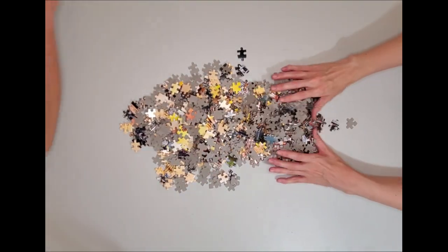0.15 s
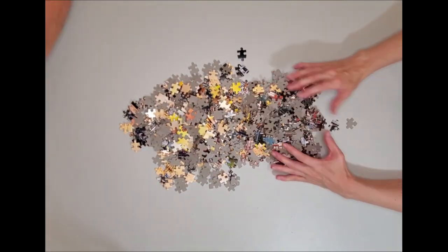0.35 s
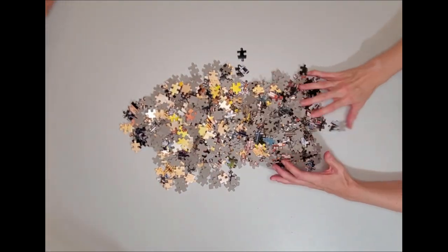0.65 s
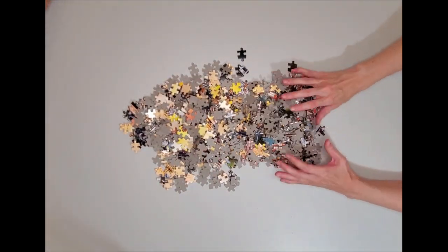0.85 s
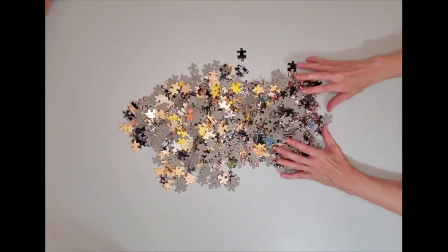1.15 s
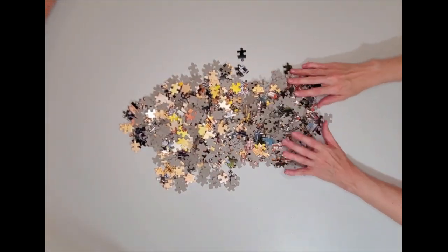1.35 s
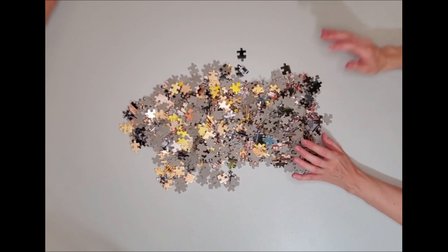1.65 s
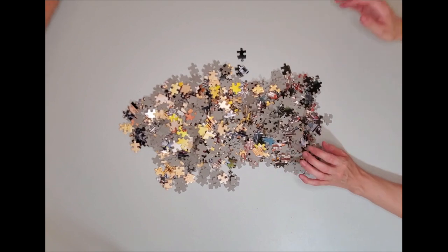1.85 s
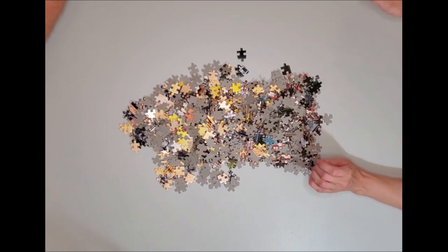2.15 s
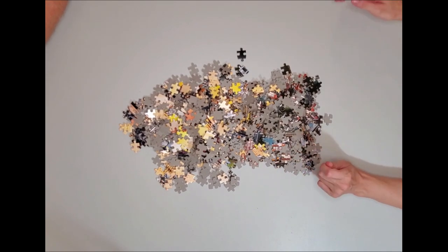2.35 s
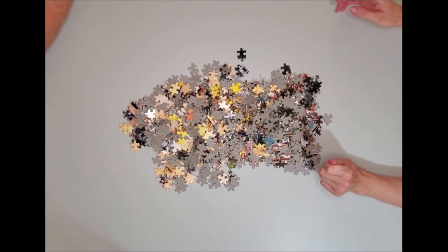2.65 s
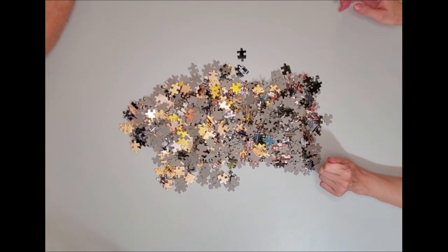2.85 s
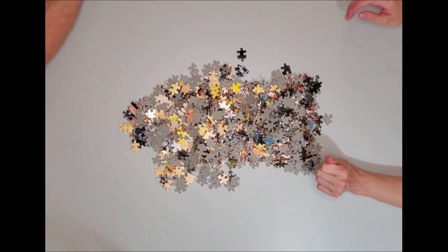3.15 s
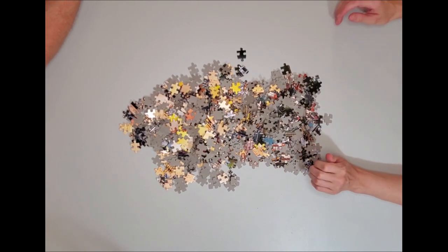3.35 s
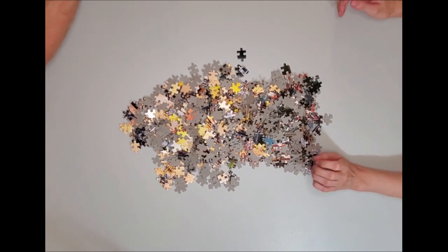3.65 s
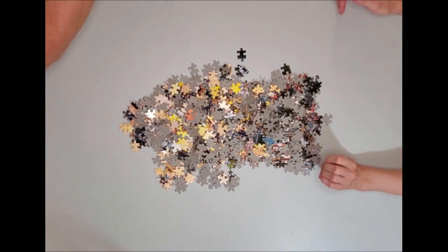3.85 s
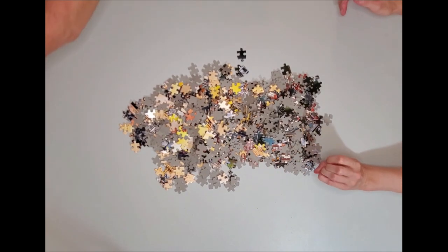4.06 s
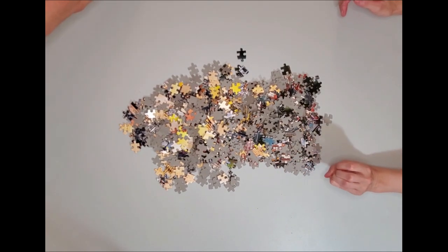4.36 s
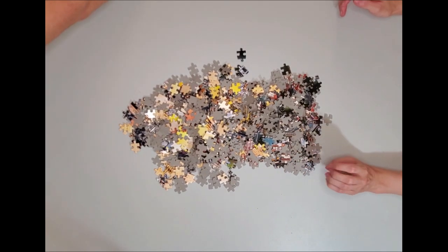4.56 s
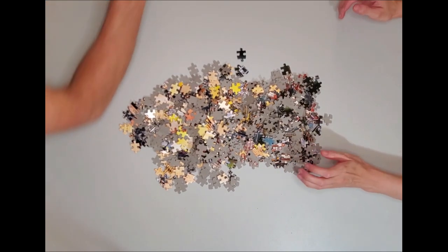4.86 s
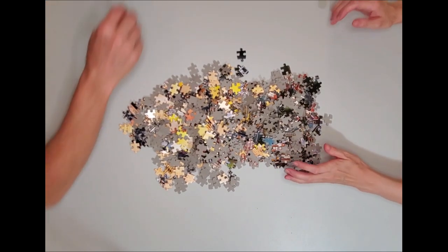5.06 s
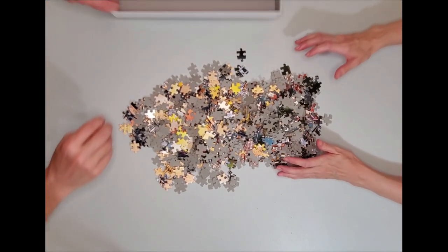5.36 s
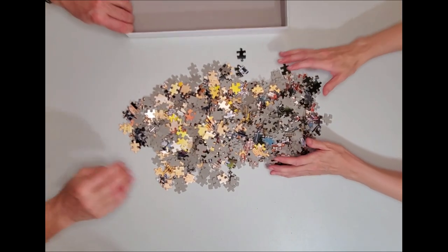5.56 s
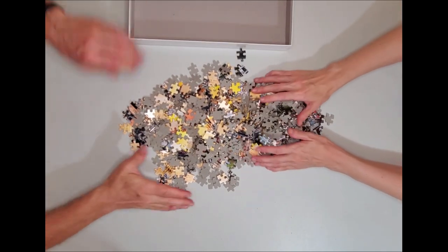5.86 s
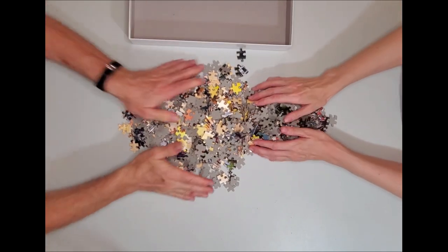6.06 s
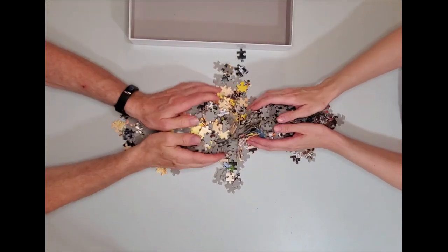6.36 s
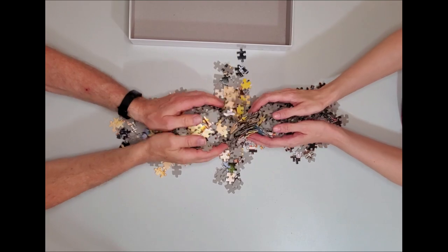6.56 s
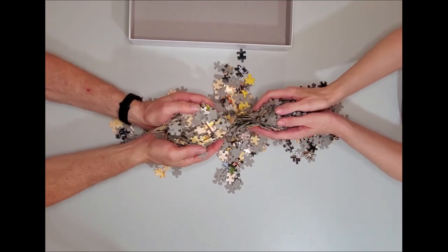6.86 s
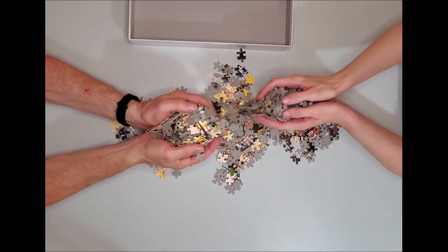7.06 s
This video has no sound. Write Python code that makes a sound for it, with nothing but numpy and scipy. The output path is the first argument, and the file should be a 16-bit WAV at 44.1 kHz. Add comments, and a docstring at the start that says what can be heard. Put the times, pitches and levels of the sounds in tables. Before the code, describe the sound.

Cardboard box thuds and rubs across a tabletop in a quiet room, followed by hands gathering loose puzzle pieces in a crisp rustling rush.

```python
"""A cardboard box is handled, knocked and set down on a table: each blow rings the air inside and the
walls under a puff of rattling card, and the box shudders. Dragging it is slip noise through resonances.
Hands sweep cardboard puzzle pieces together: dense short rings rustle, single ones clack, edges tick.
Swipes of card over card swell and die. A steady room tone lies under all; two microphone ports hear it."""
import sys
import numpy as np
from scipy import signal
from scipy.fft import rfft, irfft, next_fast_len
from scipy.io import wavfile
from scipy.ndimage import map_coordinates

SR = 44100
rng = np.random.default_rng(int(sys.argv[2]) if len(sys.argv) > 2 else 0)


def to_wav(sig):
    """Store sig (one row per channel, or 1-D mono) as 16-bit WAV at the path in sys.argv[1].

    Samples outside -1..1 are clipped; the rate is SR.
    """
    pcm = np.clip(np.atleast_2d(sig), -1, 1) * 32767
    pcm = np.round(pcm).astype(np.int16)
    wavfile.write(sys.argv[1], SR, pcm.T)  # frames by channels


N = 317520

# Room tone. Each row: frequency in Hz, relative density in dB per Hz.
AIR_SPECTRUM = [(15, -56), (25, 2), (55, 5.5), (99, -2.5), (116, -20.5), (222, -15), (291, -15),
                (437, -14.5), (672, -28.5), (791, -4.5), (1010, -12.5), (1590, -13.5), (1730, -18.5),
                (2150, -32), (3000, -43.5), (15800, -53.5)]
# Room decay. Each row: frequency in Hz, time to fall 60 dB in seconds.
ROOM_T60 = [(100, 0.42), (500, 0.21), (2000, 0.34), (8000, 0.34), (16000, 0.051)]
# Likeness of the two ports. Each row: frequency in Hz, left-right correlation.
PORT_LIKENESS = [(60, 0.83), (250, 0.92), (700, 0.6), (1500, 0.043), (4000, 0.05), (12000, 0.04)]
# Colour difference of the ports. Each row: frequency in Hz, left over right in dB.
PORT_BALANCE = [(60, -0.5), (150, 0), (380, 1), (950, 2), (2380, 1), (5980, 1), (15000, 10.5)]
# Shading by the housing, same on both ports. Each row: frequency in Hz, gain in dB.
HOUSING_SHADE = [(5500, 0.5), (7600, -8), (9500, -4.5)]
# Table rumble. Each row: frequency in Hz, relative density in dB per Hz.
RUMBLE_SPECTRUM = [(25, -40), (55, 0.5), (120, -3.5), (170, -9.5), (260, -40.5)]
# Scuff on the table. Each row: frequency in Hz, relative density in dB per Hz.
SCUFF_SPECTRUM = [(450, -4), (700, -3), (1100, -7.5), (1900, -8.5), (2800, -30.5)]
# Rustle hiss. Each row: frequency in Hz, relative density in dB per Hz.
HISS_SPECTRUM = [(3240, -16), (5500, -20), (6420, -4), (7590, -10), (10200, -7), (15100, -5.5),
                 (15800, -29.5)]
# Rubbed hollow box. Each row: resonance in Hz, width in Hz, relative level in dB.
HOLLOW_MODES = [(218.6, 28, 1), (329.8, 17.2, 9), (388.3, 25.5, 1.5), (531, 18, 1)]
# Swiped sheet. Each row: resonance in Hz, width in Hz, relative level in dB.
SHEET_MODES = [(887, 460, 3.5), (1290, 830, 2.5), (1960, 410, 3), (2980, 1400, -7.5), (4330, 1400, -6),
               (10500, 18000, -20.5)]
# Pieces sliding flat: pitch in Hz, spread as a share.
FLAT_PITCH = (2733, 0.099)
# Pieces rattling on edge: pitch in Hz, spread as a share.
EDGE_PITCH = (4080, 0.13)
# Stirred pieces and card. Each row: time in seconds, hiss level in dB, flat pieces over it in dB.
RUSTLE_CURVE = [(0.0, -60, 3.5), (0.12, -55.5, -8), (0.28, -52, 3), (0.48, -61, -2.5), (0.7, -66, 2),
                (0.97, -55, -17), (1.08, -75, -0.5), (1.5, -71.5, 1.5), (2.0, -85.5, 1),
                (2.33, -88.5, 10.5), (2.45, -73, 3.5), (3.15, -79, 8.5), (3.42, -59, 0.5), (3.62, -64, 6),
                (3.75, -53, -12), (3.85, -77, 1), (4.1, -85, -17), (4.2, -65, -15.5), (4.62, -64, 1),
                (4.9, -87, -13), (5.5, -77, -6), (5.7, -63.5, -4), (5.95, -66, 7.5), (6.17, -59, 3),
                (6.35, -50.5, 6), (6.7, -51.5, 0), (7.0, -56.5, 3.5), (7.2, -55, 2)]
# Dragged box. Each row: time in seconds, rubbing drive in dB, table rumble level in dB.
DRAG_CURVE = [(0.0, -57.5, -46), (0.14, -44.5, -61), (0.26, -49, -70), (0.44, -56, -73), (0.54, -53, -54),
              (0.98, -59, -65), (1.94, -63, -72), (2.34, -63, -67.5), (2.59, -55, -69), (2.77, -54.5, -56),
              (3.15, -57.5, -59.5), (3.35, -56.5, -57), (3.47, -43.5, -44.5), (3.57, -36.5, -70),
              (3.95, -68, -57.5), (4.31, -62, -66.5), (4.67, -62, -55), (4.95, -66, -65.5),
              (5.57, -67.5, -67), (5.73, -56, -49), (5.88, -66, -51.5), (6.17, -62.5, -52),
              (6.46, -56, -48.5), (6.74, -54.5, -48.5), (6.9, -55, -54.5), (7.2, -69, -53.5)]
# Brushes of a hand. Each row: time at full level in seconds, rise in seconds, hold in seconds, level in dB.
HAND_BRUSHES = [(0.53, 0.03, 0.014, -62), (0.802, .07, 0.023, -65.5), (0.905, 0.036, 0.013, -66),
                (1.14, 0.077, 0.034, -74), (1.305, 0.045, 0.025, -72), (1.822, 0.066, 0.039, -82),
                (2.404, .04, 0.025, -66), (2.833, 0.025, 0.04, -76), (2.924, 0.055, .02, -75),
                (3.244, 0.058, 0.021, -67), (4.17, .07, 0.018, -60), (4.279, 0.066, 0.032, -61.5),
                (4.417, 0.034, 0.015, -72), (5.165, 0.14, 0.034, -71.5), (5.73, .012, 0.15, -54.5),
                (7.09, .04, 0.16, -63)]
# Card swiped over card. Each row: loudest moment in seconds, level there in dB.
CARD_SWIPES = [(0.94, -44.5), (3.265, -46.5), (3.892, -28), (4.157, -53.5), (4.297, -56.5)]
# Pieces snapping together. Each row: time in seconds, level in dB, pitch in Hz, left over right in dB.
PIECE_CLACKS = [(1.3357, -50.5, 2630, 13.5), (1.5881, -48.5, 2900, -14), (2.407, -51, 3540, -6),
                (2.8094, -55, 3200, -11), (5.7625, -41, 3920, -15), (5.7994, -38, 3720, -9),
                (5.8494, -53, 3200, -4), (5.9948, -46, 2930, -0.5), (6.0482, -41, 2680, -1),
                (6.1581, -52, 2900, -2.0), (6.1827, -38, 2660, -1.5), (6.292, -34, 2530, 0),
                (6.2945, -28.5, 3100, -1), (6.3658, -29.5, 2660, -3), (6.3837, -30.5, 3080, 1),
                (6.516, -32, 3200, -6), (6.6196, -29.5, 2680, -3.5), (6.6805, -33.5, 2620, 0.0),
                (6.7825, -39.5, 2800, 3.5), (6.8019, -29, 2720, 0), (6.8137, -33, 2600, -2.5),
                (6.8523, -39, 2720, 0), (6.866, -28.5, 2770, -8), (6.9537, -34, 2690, -4),
                (7.0771, -29, 4200, -6.5), (7.1087, -28.5, 4060, -7), (7.1202, -26, 4100, -5),
                (7.1416, -30, 4470, -9.5)]
# Ticks of card edges. Each row: start in seconds, peak before panning in dB, left over right in dB.
EDGE_TICKS = [(0.1047, -26, -3.5), (0.1355, -34, 16), (1.5878, -49, 17), (2.557, -40, 11), (2.7053, -40, 6),
              (3.249, -37, 1.5), (3.4486, -38, 7), (3.5488, -32, 10), (3.5824, -20, 0), (3.6152, -28, 9),
              (3.6371, -17, -1), (3.8881, -38, 1), (4.321, -30.5, 6), (4.587, -37, 13), (5.7222, -22, 3),
              (5.8154, -26, 6), (6.8164, -37, 12), (7.0763, -44, 9.0), (7.0923, -37, 5), (7.1204, -27, 14)]
# Walls and table top. Each row: mode in Hz, relative level in dB, decay time as a share of the blow's.
WALL_MODES = [(84.2, 4, 2.7), (132, 2.5, 1.2), (161.5, -2.5, 1.06), (251.3, -3, 1.08), (411.8, -14.5, 1.76),
              (530, -6.5, 1.02), (582, -2, 0.37), (713, -8, 0.86), (850.5, -12, 0.89), (1074, -6, 0.64),
              (1313, -17, 0.36), (1688, -6.5, 0.35), (1700, -30, 0.13), (2122, -15, .6)]
# Loose card in a blow. Each row: frequency in Hz, gain in dB.
RATTLE_COLOUR = [(100, -8), (500, 6.5), (1200, 7), (2500, -3), (8000, 3)]
# Blows on the box. Each row: time in seconds, level in dB, air pitch in Hz, thud in dB, knock in dB,
# crack in dB (the last three relative, near 130, 1000 and 3000 Hz), time to fall 60 dB in seconds.
BOX_BLOWS = [(0.098, -35.5, 417.5, -33, -13, 1, 0.45), (0.16, -32, 351, -16.5, -11, -0.5, 0.15),
             (0.199, -40, 538, -20, -34, -27, 0.29), (0.259, -39.5, 358, -26, -16, -7, 0.28),
             (0.336, -13, 364.4, -22.5, -14.5, -39, 0.059), (0.369, -28, 353.5, -8, -7, -41, 0.12),
             (0.529, -21, 393, -13, -5, -19, 0.11), (0.641, -21, 300, -5, -24, -36, .04),
             (0.77, -39, 360, -33.5, -12, -4, 0.076), (0.931, -36.5, 516, -6, -1.5, -12, 0.085),
             (1.331, -53, 275, 2, 0, 10, 0.13), (1.813, -40.5, 348.4, -17, -7.5, -16, 0.13),
             (2.349, -40, 350, -42, 1, -29, 0.082), (2.379, -35, 340, -18, 3, -6.5, 0.087),
             (2.558, -33, 353, -8, -14, -7, 0.09), (2.704, -25, 345, -23.5, -10, -17.5, .11),
             (2.797, -37, 393, -25, -24, -3, 0.12), (3.284, -34.5, 360, -13, -6, -23, 0.081),
             (3.416, -30.5, 520, -9, -6, -12, 0.19), (3.451, -11.5, 457, -25.5, 7.5, -11, 0.095),
             (3.541, -15, 401, -9, -4, -1, 0.088), (3.584, -11, 405, -14.5, -2, -1, 0.063),
             (3.616, -23, 437, -41, 4.5, 5.5, .083), (3.665, -25.5, 312, -6, -1.5, 6.5, 0.065),
             (4.142, -53, 337, -9, -10, -3, 0.21), (4.527, -42.5, 326, -2, 2, -11, 0.15),
             (4.579, -48, 279, -1.5, -4, 0, .2), (4.696, -38.5, 357, -8.5, 5.5, 11, .13),
             (5.196, -48, 780, -18, 1, -2.5, 0.13), (5.551, -24.5, 293, -2, -16, -8.5, 0.09),
             (5.598, -30, 292, 5, -22, -12, 0.087), (5.649, -46, 464, 13.5, -15, 3, 0.097),
             (5.802, -37, 350, 2, -1.5, 6, 0.071)]

AIR_DB, TOP_HZ, FULL_SCALE = -60, 15900, 0.97
EDGE_DB, EDGE_FOLLOWS_FLAT = 0.5, 0.4  # over the rustle; share of the flat pieces' lead added
PILE_DB = -11.5  # scuff of the sliding heap, over the flat pieces
SCUFF_DB, RUB_GROWS = -2, 1.4  # over the drive; hollow swings wider around the mean drive
SHAKE_DB, SHAKE_RISE_S, SHAKE_T60_S = -19, 0.004, 0.09  # level relative to the blow
SHAKE_SCUFF_DB, SHAKE_RUMBLE_DB = -4.5, -16.5  # over the shudder of the hollow
BRUSH_T60_S = 0.2
BRUSH_HISS_DB, BRUSH_FLAT_DB, BRUSH_EDGE_DB = 1.5, -4, -1  # over the brush level
SWIPE_RISE_S, SWIPE_T60_S = 0.057, 0.1  # per 60 dB up, per 60 dB down
TAP_DB, TAP_DB_PER_OCTAVE = -15, -20  # at the flat pitch; slope with clack pitch
RISE_S, RISE_AT_DB, RISE_S_PER_DB = 0.000855, -18, 0.0000969  # weaker blows rise slower
LEAD_MS = 0.15  # the left port hears the box first


def amp(db):
    """dB to gain."""
    return 10 ** (np.asarray(db) / 20)


def unit(x):
    """Scaled to rms 1."""
    return x / np.sqrt(np.mean(x ** 2) + 1e-20)


def along(points, hz):
    """Interpolates (Hz, value) points on a log frequency axis."""
    f, v = np.transpose(points)
    return np.interp(np.log(hz + 1), np.log(f + 1), v)


def spectrum(points):
    """Gain response through (Hz, dB) points."""
    return lambda hz: amp(along(points, hz))


def curves(rows):
    """One value per sample for each column after the time."""
    s, *columns = np.transpose(rows)
    return [np.interp(np.arange(N) / SR, s, column) for column in columns]


def filtered(x, response):
    """x times a complex response of frequency, zero-padded."""
    n = x.shape[-1]
    m = next_fast_len(n + 8192)
    return irfft(rfft(x, m) * response(np.fft.rfftfreq(m, 1 / SR)), m)[..., :n]


def resonant(modes):
    """Causal response of (Hz, width, dB) resonances with alternating signs."""
    def response(f):
        total = 0
        for k, (centre, width, db) in enumerate(modes):
            damping = 1j * f * width
            total = total + (-1) ** k * amp(db) * damping / (centre ** 2 - f ** 2 + damping)
        return total
    return response


def spread(pair, response):
    """Colours two trains and mixes them to left and right with the ports' likeness, rms 1."""
    def mid_side(hz):
        turn = np.arccos(np.clip(along(PORT_LIKENESS, hz), -1, 1)) / 2
        return response(hz) * np.array([np.cos(turn), np.sin(turn)])
    mid, side = filtered(pair, mid_side)
    return unit(np.array([mid + side, mid - side]))


def panned(db):
    """Left and right gains."""
    return amp([[db / 2], [-db / 2]])


def room_tail():
    """One draw of the room's answer: it builds up, then each frequency dies at its own speed."""
    hz, t, z = signal.stft(rng.standard_normal((2, SR // 3)), SR, nperseg=256)
    dying = amp(-60 * t / along(ROOM_T60, hz)[:, None]) * (1 - np.exp(-t / 0.0014))
    noise = signal.istft(z * dying, SR, nperseg=256)[1]
    pair = spread(noise, lambda f: 1)
    return pair / np.linalg.norm(pair[0])


def add(out, s, sound, answer, lead_ms=0):
    """Places a stereo event with the room's answer; the right port lags by lead_ms."""
    heard = signal.fftconvolve(sound.mean(axis=0)[None], answer, axes=1)
    heard[:, :sound.shape[1]] += sound
    for port, lag_s in enumerate((0, lead_ms / 1000)):
        out[port, round((s + lag_s) * SR):][:heard.shape[1]] += heard[port]


def room_tone():
    """Steady coloured noise of the quiet room."""
    return amp(AIR_DB) * spread(rng.standard_normal((2, N)), spectrum(AIR_SPECTRUM))


def grit(per_second, spread_db, smooth):
    """Two trains of tiny slips of uneven size over a share of smooth friction."""
    slips = (rng.random((2, N)) < per_second / SR) * amp(spread_db * rng.random((2, N)))
    return unit(slips * rng.choice([-1, 1], (2, N))) + smooth * rng.standard_normal((2, N))


def chips(pitch, per_second, cycles, spread_db, smooth):
    """Piece contacts each ring a few cycles at their own pitch, in clumps, over their friction."""
    centre_hz, share = pitch
    count = round(per_second * N / SR)
    at, size, side = rng.random((count, 3)).T
    # slow random curves: neighbours in time sound alike
    rows = np.repeat([[0], [1]], count, 1)
    drift, clump = map_coordinates(rng.standard_normal((2, 140)), [rows, np.tile(at * 139, (2, 1))])
    detune = 0.8 * rng.standard_normal((count, 1)) + 0.5 * drift[:, None]
    hz = centre_hz * np.exp(share * detune)
    t = np.arange(SR // 100) / SR
    gain = amp(spread_db * size + 3 * clump)[:, None]
    ring = gain * np.sin(2 * np.pi * hz * t) * t * np.exp(-t * hz / cycles)
    where = ((at * N).astype(int)[:, None] + np.arange(len(t))).ravel()
    pair = [np.bincount(where, (ring * (side[:, None] - k)).ravel(), N + len(t))[:N] for k in (0, 1)]
    friction = filtered(rng.standard_normal((2, N)), resonant([(centre_hz, 2.5 * centre_hz * share, 0)]))
    return spread(unit(np.array(pair)) + smooth * unit(friction), lambda f: 1)


def brushes():
    """Gain of the hand brushes: smooth rise, hold, exponential fade."""
    gain, t = np.zeros(N), np.arange(N) / SR
    for s, rise_s, hold_s, db in HAND_BRUSHES:
        fade_db = -60 * np.maximum(t - s - hold_s, 0) / BRUSH_T60_S
        rise = np.sin(np.pi / 2 * np.clip(1 + (t - s) / rise_s, 0, 1)) ** 2
        gain += amp(db + fade_db) * rise
    return gain


def shudder():
    """Gain that swells after every blow and dies away; short blows shudder shorter."""
    out, t = np.zeros(N + SR), np.arange(SR // 2) / SR
    for s, db, *_, t60_s in BOX_BLOWS:
        dying = amp(db + SHAKE_DB - 60 * t / min(SHAKE_T60_S, t60_s))
        out[round(s * SR):][:len(t)] += (1 - np.exp(-t / SHAKE_RISE_S)) * dying
    return out[:N]


def handling():
    """Slips of hands, box and pieces excite what they touch; blows also shake the box on the table."""
    rustle_db, flat_db = curves(RUSTLE_CURVE)
    drag_db, rumble_db = curves(DRAG_CURVE)
    rub_db = drag_db.mean() + RUB_GROWS * (drag_db - drag_db.mean())
    edge_db = EDGE_DB + EDGE_FOLLOWS_FLAT * flat_db
    shake, brush = shudder(), brushes()

    rumble = spread(grit(87, 3.9, smooth=0.82), spectrum(RUMBLE_SPECTRUM))
    rub = spread(grit(120, 16.6, smooth=0.34), resonant(HOLLOW_MODES))
    scuff = spread(grit(300, 13, smooth=1.0), spectrum(SCUFF_SPECTRUM))
    hiss = spread(grit(1200, 12, smooth=1.2), spectrum(HISS_SPECTRUM))
    flat = chips(FLAT_PITCH, 900, cycles=2.2, spread_db=13, smooth=0.95)
    edge = chips(EDGE_PITCH, 1000, cycles=2.0, spread_db=12, smooth=1.3)

    box = (amp(rumble_db) + amp(SHAKE_RUMBLE_DB) * shake) * rumble
    box += (amp(rub_db) + shake) * rub
    box += (amp(drag_db + SCUFF_DB) + amp(SHAKE_SCUFF_DB) * shake) * scuff
    brushed = brush * (amp(BRUSH_HISS_DB) * hiss + amp(BRUSH_FLAT_DB) * flat + amp(BRUSH_EDGE_DB) * edge)
    heap = amp(flat_db) * (flat + amp(PILE_DB) * scuff)
    rustle = amp(rustle_db) * (hiss + heap + amp(edge_db) * edge)
    return box + brushed + rustle


def swipes(tails):
    """Friction swells quickly and dies away, coloured by the sheet's resonances."""
    out, t = np.zeros((2, N + SR)), np.arange(-SR // 20, SR // 5) / SR
    for k, (s, db) in enumerate(CARD_SWIPES):
        friction = spread(rng.standard_normal((2, len(t))), resonant(SHEET_MODES))
        stroke = amp(db - 60 * np.maximum(-t / SWIPE_RISE_S, t / SWIPE_T60_S))
        add(out, s + t[0], stroke * friction, amp(-3) * tails[k % len(tails)])
    return out[:, :N]


def clacks(tails):
    """Pieces snap: two damped partials and noise, with a low tap on the table."""
    out, t = np.zeros((2, N + SR)), np.arange(SR // 30) / SR
    for k, (s, db, hz, pan_db) in enumerate(PIECE_CLACKS):
        body = np.sin(2 * np.pi * hz * t) + 0.48 * np.sin(2 * np.pi * 1.17 * hz * t)
        body += 0.5 * rng.standard_normal(len(t))
        tap_db = TAP_DB + TAP_DB_PER_OCTAVE * np.log2(hz / FLAT_PITCH[0])
        tap = amp(tap_db) * np.sin(2 * np.pi * 620 * rng.uniform(0.84, 1.33) * t)
        envelope = amp(db - 60 * t / 0.017) * (1 - np.exp(-t / 0.001))
        add(out, s - 0.001, envelope * (body + tap) * panned(pan_db), amp(-9) * tails[k % len(tails)])
    return out[:, :N]


def ticks(tails):
    """Card edges tick: bright noise in a snap, then a short fizz."""
    out, t = np.zeros((2, N + SR)), np.arange(SR // 30) / SR
    for k, (s, db, pan_db) in enumerate(EDGE_TICKS):
        noise = rng.standard_normal((2, len(t)))
        bright = filtered(noise, lambda f: (f / (f + 6000)) ** 1.03 * (f > 4500))
        tick = (amp(-60 * t / 0.003) + amp(-11 - 60 * t / 0.06)) * bright
        tick = amp(db) * tick / np.abs(tick).max()
        add(out, s, tick * panned(pan_db), amp(2) * tails[k % len(tails)])
    return out[:, :N]


def knocks(tails):
    """Each blow rings the air in the box and its walls, with a puff of rattling card on top."""
    out, t = np.zeros((2, N + SR)), np.arange(SR // 4) / SR
    for k, (s, db, air_hz, thud_db, knock_db, crack_db, t60_s) in enumerate(BOX_BLOWS):
        colour = [(40, thud_db - 26), (130, thud_db), (400, 0),
                  (1000, knock_db), (3000, crack_db), (12000, crack_db - 33.5)]
        ring = amp(-60 * t / t60_s) * np.sin(2 * np.pi * air_hz * t)
        for hz, level_db, share in WALL_MODES:
            wall_db = level_db + along(colour, hz) + rng.normal(0, 1)
            ring += amp(wall_db - 60 * t / (share * t60_s)) * np.sin(2 * np.pi * hz * t)
        rattle = lambda f: amp(along(colour, f) + along(RATTLE_COLOUR, f))
        puff = spread(rng.standard_normal((2, len(t))), rattle)
        # restores the level the rattle colour gives to white noise
        puff_size = np.sqrt(np.mean(rattle(np.linspace(0, SR / 2, num=400)) ** 2))
        puff = puff_size * amp(-60 * t / (1.36 * t60_s)) * puff
        rise_s = RISE_S + RISE_S_PER_DB * (RISE_AT_DB - db)
        swell = (1 - np.exp(-t / rise_s)) ** 2
        add(out, s - 0.001, amp(db) * swell * (ring + puff), amp(-5.5) * tails[k % len(tails)], LEAD_MS)
    return out[:, :N]


def scene():
    """Everything on the table over the room tone."""
    tails = [room_tail() for _ in range(11)]
    return room_tone() + handling() + swipes(tails) + clacks(tails) + ticks(tails) + knocks(tails)


def record(dry):
    """Ports differ in colour and lose deep bass; peaks are rounded off, then the band is limited."""
    def port(hz):
        balance_db = along(PORT_BALANCE, hz) * np.array([[0.5], [-0.5]])
        bass_cut = (1j * hz / (45 + 1j * hz)) ** 2
        return amp(along(HOUSING_SHADE, hz) + balance_db) * bass_cut
    x = filtered(dry, port)
    rounded = x / (1 + np.abs(x / FULL_SCALE) ** 6) ** (1 / 6)
    return filtered(rounded, lambda hz: hz < TOP_HZ)


dry = scene()
out = record(dry)
to_wav(out)
```